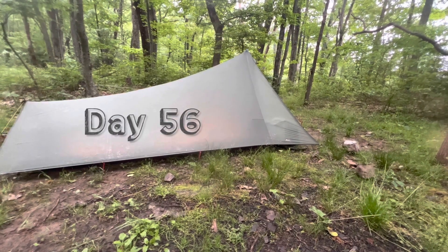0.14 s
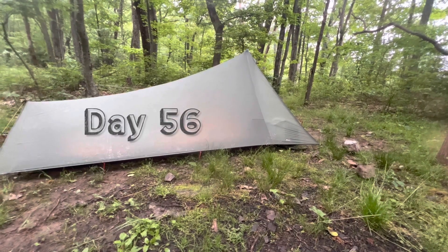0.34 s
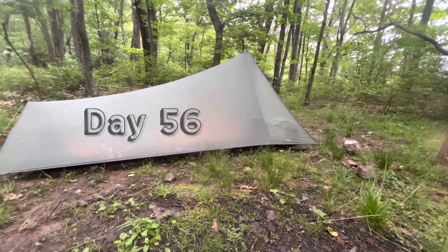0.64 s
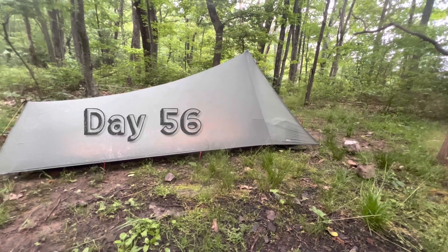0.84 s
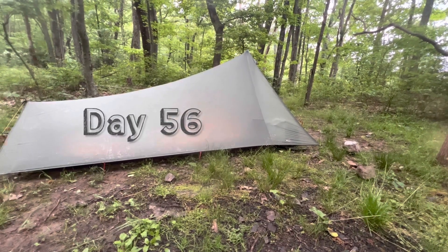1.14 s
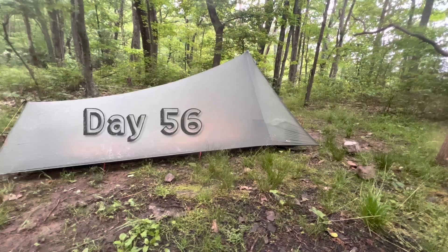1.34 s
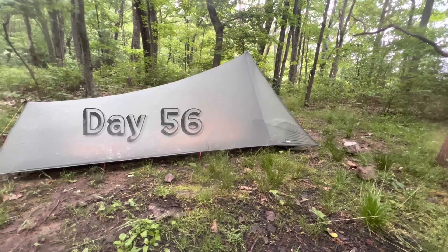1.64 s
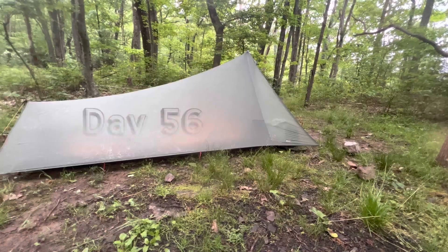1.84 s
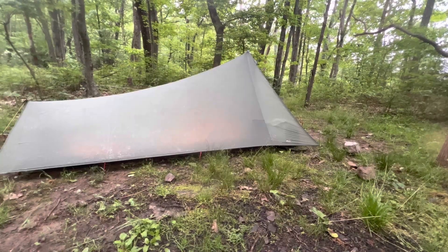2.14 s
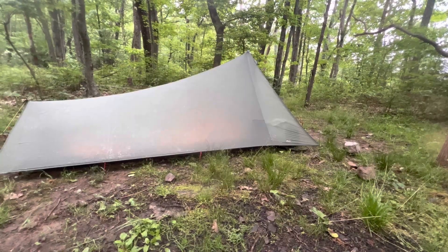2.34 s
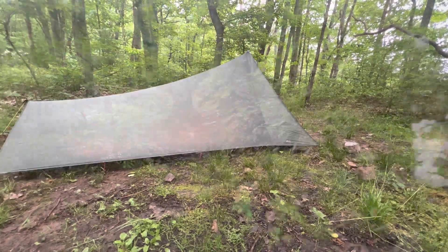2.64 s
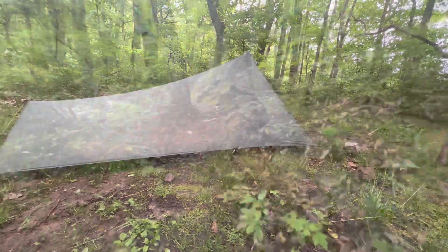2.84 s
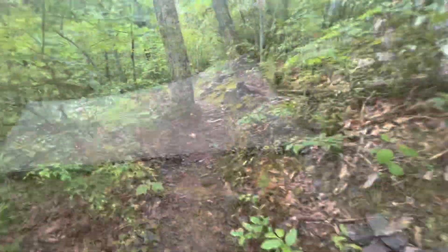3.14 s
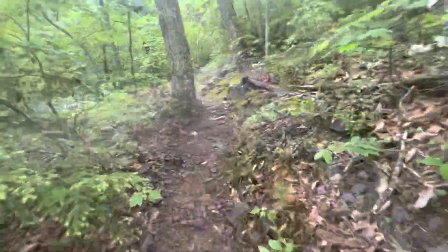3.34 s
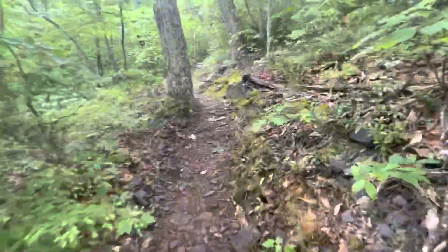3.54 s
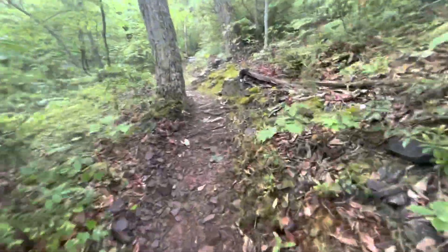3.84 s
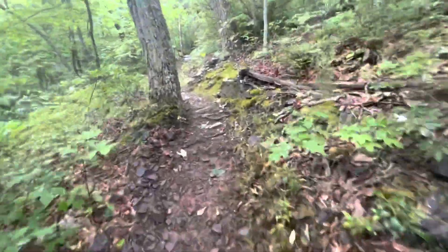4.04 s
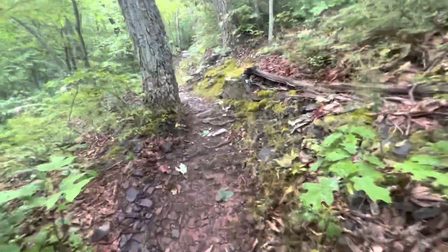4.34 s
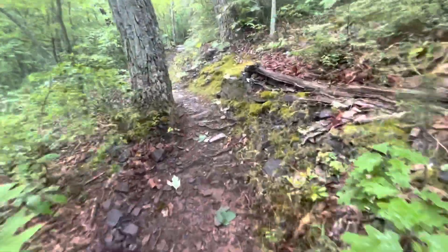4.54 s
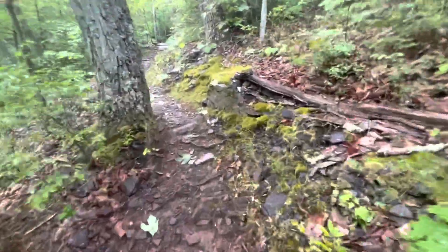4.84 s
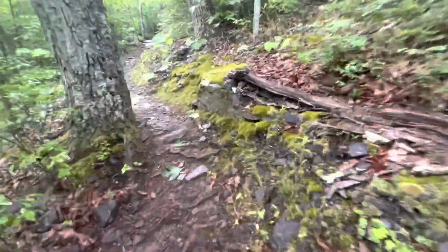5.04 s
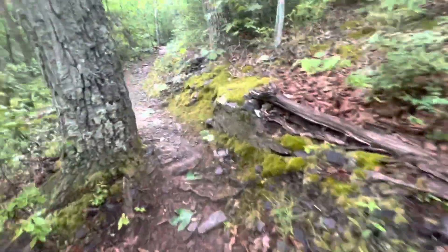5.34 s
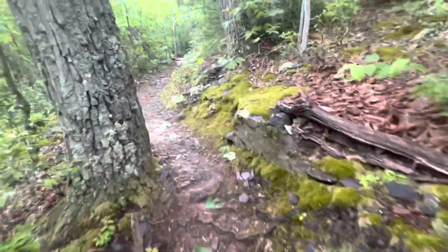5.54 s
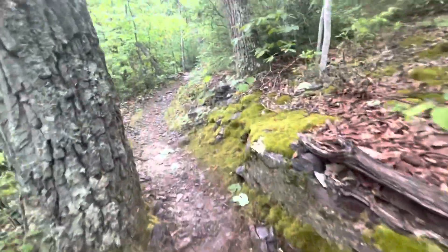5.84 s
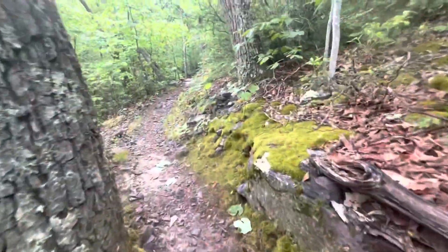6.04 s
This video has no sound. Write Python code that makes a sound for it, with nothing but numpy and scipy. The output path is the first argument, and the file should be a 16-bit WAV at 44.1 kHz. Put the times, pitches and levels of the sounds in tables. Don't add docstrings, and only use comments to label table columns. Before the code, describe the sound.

A faint hush of leaves in damp woods, with thin songbird whistles echoing off trunks and drops tapping a taut tarp and leaves. After nearly three seconds a walker sets off very close to the stereo microphone: soles crunch and scuff grit, stones knock and roll, cloth swishes, and pole tips crack sharply on rock.

```python
import sys
import numpy as np
from scipy import signal
from scipy.io import wavfile
from scipy.ndimage import uniform_filter1d, minimum_filter1d

SR = 44100
rng = np.random.default_rng(int(sys.argv[2]) if len(sys.argv) > 2 else 0)


def wav_record(signal):
    frames = np.transpose(np.atleast_2d(signal))
    bounded = np.clip(frames, -1, 1)
    quanta = np.round(bounded * 32767).astype(np.int16)
    wavfile.write(sys.argv[1], SR, quanta)


def ratio(d):
    e = np.asarray(d, float) / 20
    return 10 ** e


N = 272097

# t/s, grit level/dB, heel weight over grit/dB, scuff over grit/dB
SOLE_PRESSES = [(2.772, -39.5, -6.5, -5), (2.87, -57, 8.5, -14), (3.04, -56.5, -15, -11),
                (3.15, -70, -12, 17), (3.41, -46, 1, 1.5), (3.56, -49.5, -6, -3.5), (3.65, -53, -21, -20),
                (3.879, -47, -6, -2.5), (3.96, -47, -3, -2.5), (4.14, -53.5, -4.5, 4),
                (4.37, -68.5, -19, 17.5), (4.462, -51, 3, -3.5), (4.53, -49, -7, -0.5), (4.68, -53, 0, 0),
                (4.75, -51, 4.5, 1), (4.84, -72.5, -8, 15), (4.926, -51, 6.5, -6), (5.011, -45, -3, -0.5),
                (5.12, -50, -8.5, -3), (5.23, -50, -9, 5), (5.572, -48, -7, -0.5), (5.662, -45.5, -21, -5),
                (5.779, -56, 4.5, -17), (5.868, -46, -12, -20), (6.0, -55.5, -24, -5.5),
                (6.12, -49, -1, -6)]
TREBLE_HZ = 12430


def rms_one(x):
    return x / np.sqrt(np.mean(x ** 2) + 1e-20)


def at_hz(points, hz):
    f, value = np.array(points).T
    return np.interp(np.log(hz), np.log(f), value)


def band(x, low_hz, high_hz):
    return signal.sosfilt(signal.butter(2, [low_hz, min(high_hz, .46 * SR)], "band", fs=SR, output="sos"), x)


def drift(rate_hz):
    r = np.exp(-80 * np.pi * rate_hz / SR)
    slow = signal.lfilter([1], [1, -2 * r, r * r], rng.standard_normal(N // 40 + 2002))[2000:]
    return np.interp(np.arange(N) / 40, np.arange(len(slow)), rms_one(slow))


def stereo(pair, hz):
    # f/Hz, left-right likeness (-1 to 1)
    port_likeness = [(60, 0.625), (180, 0.82), (550, 0.56), (1650, 0.086), (4970, -0.13), (15000, -0.06)]
    alike = np.clip(at_hz(port_likeness, hz), -.95, .95)
    return np.sqrt(1 + alike) * pair[0] + np.sqrt(1 - alike) * pair[1] * [[1], [-1]]


def coloured(spectrum, patchy_db):
    out, white = 0, rng.standard_normal((2, 2, N))
    lowest_hz, highest_hz = spectrum[0][0], spectrum[-1][0]
    edges = lowest_hz * 2 ** np.arange(0, np.log2(highest_hz / lowest_hz) + .1, 1 / 3)
    for k, (low, high) in enumerate(zip(edges, edges[1:])):
        hz = np.sqrt(low * high)
        gain = ratio(at_hz(spectrum, hz) + patchy_db * drift(14.9))
        out = out + gain * stereo(band(white[k % 2], low, high), hz)
    return out


def trees(x, t60):
    t = np.arange(int(.6 * SR)) / SR
    tail = rng.standard_normal((2, len(t))) * ratio(-60 * t / t60) * (t > .012)
    return signal.fftconvolve(x[None], tail / np.sqrt(np.sum(tail ** 2) / 2), axes=1)[:, :N]


def taps(events, spread, alike, length_ms, crack_db):
    out, t = np.zeros((2, N + 2048)), np.arange(2000) / SR
    puff = np.sqrt(t) * np.exp(-t / (length_ms / 1000))
    port_lag_s = 0.00045
    for s, peak_db, hz, pan_db in events:
        shared, *own = rng.standard_normal((3, len(t)))
        body = 3.4 * np.sqrt(hz / SR) * np.sin(2 * np.pi * hz * t)
        tap = (shared + body + np.clip(1 - alike, 0, 1) * 2 * np.array(own)) * puff
        ring = band(band(tap, hz / spread, hz * spread), hz / 3, min(hz * 3, TREBLE_HZ))
        tap = rms_one(ring) + ratio(crack_db) * rms_one(band(tap, TREBLE_HZ, 15600))
        side_db = np.array([[pan_db], [-pan_db]]) / 2
        tap = tap / np.abs(tap).max(axis=1, keepdims=True) * ratio(peak_db + 1.0 + side_db)
        lag = round(port_lag_s * SR * np.clip(pan_db / 3, -1, 1))
        for side, late in enumerate((max(-lag, 0), max(lag, 0))):
            i = round(s * SR) + late
            out[side, i:i + len(t)] += tap[side]
    return out[:, :N]


def thuds(events):
    return taps(events, spread=2.53, alike=0.97, length_ms=2.56, crack_db=-60)


def knocks(events):
    return taps(events, spread=1.82, alike=0.268, length_ms=1.8, crack_db=-33)


def ticks(events):
    return taps(events, spread=2.02, alike=0.65, length_ms=0.92, crack_db=-12.5)


def footfalls():
    # t/s, peak level/dB, ring f/Hz, left-right/dB
    landings = [(2.722, -51.5, 554, 0), (2.833, -43.5, 540, -0.5), (3.133, -40.5, 322, 0.5),
                (3.138, -42.5, 296, 1), (3.336, -42.5, 851, -18.5), (3.378, -38.5, 475, 0),
                (3.389, -35, 548, 0), (3.403, -45, 880, 11), (3.617, -44, 426, 1), (3.868, -39.5, 570, 0.5),
                (3.889, -38, 562, 2), (3.897, -30.5, 500, 1.5), (4.45, -41, 358, -1.5),
                (4.734, -27, 484, 1), (4.744, -35.5, 585, 16), (4.989, -56, 899, -3.5),
                (5.005, -38.5, 405, 0.5), (5.047, -40, 656, 0), (5.183, -32.5, 720, 7),
                (5.556, -35.5, 523, 1), (5.566, -35.5, 298, 0), (3.084, -49, 450, 4), (3.791, -45, 643, 0),
                (4.463, -41, 384, 4), (5.769, -38, 787, 0.5), (6.105, -35.5, 320, 0.5)]
    # t/s, peak level/dB, ring f/Hz
    stones = [(2.7242, -39, 1595), (2.8593, -36, 1864), (3.083, -41, 2542), (3.1355, -38.5, 880),
              (3.331, -39.5, 2480), (3.458, -47.5, 1005), (3.7887, -36, 2280), (3.85, -37, 2290),
              (3.8885, -43, 1380), (4.117, -35, 1500), (4.14, -34, 2930), (4.255, -41, 2341),
              (4.445, -38, 1362), (4.519, -36.5, 1010), (4.545, -36, 2800), (4.9884, -35, 1250),
              (5.053, -33.5, 2222), (5.182, -34.5, 2126), (5.3977, -39, 2410), (5.5652, -35.5, 1330),
              (5.594, -34, 1468), (5.8536, -36, 1232), (6.1032, -31, 1400)]
    # t/s, peak level/dB, ring f/Hz, left-right/dB
    snaps = [(2.7915, -51.5, 1290, 1.5), (2.813, -47.5, 1350, -1.5), (2.8358, -32.5, 1290, 0),
             (2.855, -45, 1800, 1), (3.134, -36.5, 2400, -0.5), (3.2775, -44, 910, -0.5),
             (3.278, -40.5, 2800, 0), (4.376, -43, 1800, 0), (5.177, -43.5, 2200, -0.5),
             (5.261, -37, 1000, 5), (3.3785, -29.5, 827, 1), (3.4055, -25.5, 1050, 0),
             (3.411, -24.5, 1310, 1), (3.4235, -31.5, 2580, 2.5), (3.4605, -41, 800, 0),
             (3.5495, -35.5, 3300, -2), (3.5685, -36, 2680, 2), (3.633, -45.5, 1300, -0.5),
             (3.493, -39.5, 990, -0.5), (3.8415, -34, 1390, 2.5), (3.9185, -36, 1100, -1),
             (3.9355, -30.5, 1200, 4), (3.9387, -23, 1346, 1.5), (3.9437, -27, 1050, -0.5),
             (3.951, -43, 1100, 7), (3.958, -28, 1090, -1.5), (3.961, -31, 1050, -1),
             (3.9675, -43, 3100, 1.5), (3.9757, -20, 1198, 1), (4.061, -42, 1070, 2), (4.338, -40, 2630, 2),
             (4.3585, -32.5, 1300, 1), (4.4168, -30.5, 1510, -1), (4.4168, -35, 2940, -12),
             (4.498, -50.5, 1290, 3), (4.525, -30.5, 1686, 1), (4.529, -37, 1100, -0.5),
             (4.7332, -7.5, 1626, 2.5), (4.7385, -29, 900, -2), (4.968, -50, 1000, 0), (5.052, -34, 892, 1),
             (5.101, -37, 900, 0), (5.153, -37, 2300, 5), (5.773, -31, 1360, 0), (5.878, -37, 1320, -0.5),
             (5.896, -32.5, 1326, 0), (5.997, -42, 780, -2)]
    # t/s, peak level/dB, ring f/Hz, left-right/dB
    clicks = [(2.765, -39.5, 5950, 7.5), (2.861, -41.5, 6320, 13), (4.995, -40, 10000, 3),
              (3.137, -30.5, 8170, 6.5), (3.3314, -42.5, 6150, 4.5), (3.341, -31, 9600, -4),
              (3.394, -31, 5836, 12), (3.423, -33, 4272, 8), (3.804, -39.5, 4700, -0.5),
              (3.841, -30, 6010, 6), (3.868, -30.5, 5944, 8), (3.894, -36, 5700, 16),
              (3.9371, -38, 4920, 16), (4.416, -43, 6300, 8), (4.441, -23, 9660, -7),
              (4.4667, -41, 5100, 16), (4.518, -37.5, 8757, 11), (4.5795, -44, 5770, 12),
              (4.735, -19, 8800, 2), (4.8826, -15, 5470, 4), (4.732, -37, 10430, 0), (4.883, -29, 10460, 1),
              (5.158, -27, 9400, 2.5), (5.3871, -35.5, 6040, 7), (5.404, -43, 6520, 9),
              (5.553, -25.5, 10200, -4.5), (5.7717, -34, 9100, -2), (5.857, -26, 5130, 13.5)]
    stone_pan_db = -0.26
    sound = thuds(landings) + ticks(clicks)
    sound += knocks([(*stone, stone_pan_db) for stone in stones] + rolling())
    return sound + taps(snaps, spread=1.84, alike=0.652, length_ms=0.61, crack_db=-46)


def rolling():
    rolls = [
        (3.396, -28.5, 2497, 0),
        (3.406, -26.5, 1130, 1.5),
        (3.547, -33, 2531, 2),
        (3.566, -35, 2284, 9),
    ]
    gap_s, build_db, loss_db, pitch_spread = 0.0053, 4.0, 2.5, 0.068
    touches = []
    for (s, db, hz, pan_db), luck in zip(rolls, rng.standard_normal((len(rolls), 6, 2))):
        for k, (late, pitch) in zip(range(-1, 5), luck):
            below_db = loss_db * k if k > 0 else -build_db * k
            touch_s = s + gap_s * k * (1 + 0.19 * late)
            touches.append((touch_s, db - below_db, hz * (1 + pitch_spread * pitch), pan_db))
    return touches


def pole_tips():
    # t/s, peak level/dB, ring f/Hz, left-right/dB
    strikes = [(4.732, -19.5, 2566, 2), (4.7425, -16, 2510, 5), (4.883, -16, 2722, 2.5),
               (4.8902, -19, 2530, 1), (4.896, -16, 2570, 2), (4.901, -24, 2515, 1),
               (4.906, -13.5, 2650, 3), (4.9158, -14.5, 2340, 0.5), (4.917, -17, 1166, 9.5),
               (4.9185, -17, 595, 2.5), (5.589, -28, 2840, 6), (4.7335, -23.5, 4290, 5),
               (4.7345, -21, 6340, 2.5), (4.745, -23, 4630, 6), (4.9078, -22, 4960, 13.5),
               (4.9085, -27, 8100, 1.5), (4.9174, -27, 5190, -3)]
    return taps(strikes, spread=2.17, alike=0.6, length_ms=1.6, crack_db=-39)


def skids():
    # t/s, level/dB, half length/s, first f/Hz, last f/Hz
    slides = [(2.87, -48.5, .018, 2007, 2514), (3.036, -50.5, 0.015, 2083, 2800),
              (3.548, -36.5, 0.0075, 2600, 2567), (3.55, -40, .008, 3940, 3900),
              (3.59, -45, 0.0103, 2486, 1986), (4.31, -54, 0.0081, 2700, 2750),
              (4.877, -42, 0.0038, 2600, 2780), (5.238, -50.5, 0.021, 2570, 3130),
              (5.296, -52.5, 0.0132, 2650, 1829), (5.529, -50, 0.013, 2474, 2783),
              (5.825, -54, 0.0138, 2620, 2616)]
    out = np.zeros((2, N))
    narrow = signal.butter(2, 396, fs=SR, output="sos")
    slow = rms_one(signal.sosfilt(narrow, rng.standard_normal((2, 2, N))))
    for s, db, half_s, first_hz, last_hz in slides:
        i = np.arange(int((s - 3 * half_s) * SR), int((s + 3 * half_s) * SR))
        away = (i / SR - s) / half_s
        phase = 2 * np.pi * np.cumsum(np.interp(away, [-2, 2], [first_hz, last_hz])) / SR
        singing = slow[0][:, i] * np.cos(phase) + slow[1][:, i] * np.sin(phase)
        out[:, i] += ratio(db) * np.exp(-.5 * away ** 2) * singing
    return out


def pressing(over_db, rise, fall, rest_db):
    presses = np.array(SOLE_PRESSES)
    since = np.arange(0, N + 64, 64) / SR - presses[:, :1]
    db = (presses[:, 1] + over_db)[:, None] - np.where(since < 0, -rise * since, fall * since)
    gain = np.sqrt(np.sum(ratio(db) ** 2, axis=0) + ratio(rest_db) ** 2)
    return np.interp(np.arange(N) / 64, np.arange(len(gain)), gain)


def gritty(low_hz, high_hz, per_s, spread_db, clump_db):
    sizes = ratio(spread_db * np.minimum(rng.exponential(1, N), 4))
    born, dealt = rng.random(N) < per_s / SR, rng.integers(0, 4, N)
    grains = born * sizes * ratio(clump_db * drift(32.0)) * rng.standard_normal((2, N))
    edges = np.geomspace(low_hz, high_hz, 5)
    rings = sum(band(grains * (dealt == k) + 1e-18, edges[k], edges[k + 1]) for k in range(4))
    return rms_one(stereo(rings, np.sqrt(low_hz * high_hz)))


def cloth():
    # f/Hz, level/dB per Hz
    swish_spectrum = [(1180, -5.5), (2000, -7), (2850, -4), (3370, -16.5), (5420, -7.5), (6360, -10.5),
                      (9210, -5), (10600, -14), (11500, -30), (12700, -27.5), (14800, -20), (16500, -53)]
    # t/s, level/dB, half length/s
    strides = [(2.773, -41, 0.0163), (2.876, -36.5, 0.0145), (3.042, -43.5, 0.034), (3.427, -49.5, 0.029),
               (3.586, -46.5, 0.045), (3.905, -53, 0.064), (4.13, -44.5, 0.041), (4.512, -49.5, 0.0473),
               (4.701, -41, 0.0473), (5.01, -48.5, 0.042), (5.237, -40.5, 0.0387), (5.401, -52, 0.02),
               (5.577, -57, 0.099), (5.821, -44, 0.0597), (6.16, -50.5, 0.067)]
    t = np.arange(N) / SR
    rubbing = ratio(-54) + sum(ratio(db) * np.exp(-.5 * ((t - s) / half_s) ** 2) for s, db, half_s in strides)
    rubbing = rubbing * ratio(1.5 * drift(70))
    swish = rubbing * rms_one(coloured(swish_spectrum, patchy_db=-3.0))
    fine = band(band(rng.standard_normal((2, N)), 12100, 15600), 12100, 15600)
    return swish + ratio(-70.5) * rms_one(stereo(fine, 500))


def walker():
    _, _, heel_db, scuff_db = np.transpose(SOLE_PRESSES)
    heel = gritty(71.0, 320, per_s=730, spread_db=0.0, clump_db=0.5)
    grit = gritty(380, 1900, per_s=2500, spread_db=1.8, clump_db=1.2)
    scuff = gritty(750, 5000, per_s=5000, spread_db=2.0, clump_db=1.0)
    sound = pressing(heel_db, rise=320, fall=289, rest_db=-67) * heel
    sound += pressing(0, rise=231, fall=95, rest_db=-59) * grit
    sound += pressing(scuff_db, rise=350, fall=130, rest_db=-60) * scuff
    sound += cloth()
    return sound * np.clip((np.arange(N) / SR - 2.6) / 0.78, 0, 1)


def drips():
    # t/s, peak level/dB, ring f/Hz, left-right/dB
    drumming = [(0.08, -53.5, 382, 1), (0.204, -55, 192, 5), (0.306, -51.5, 816, 1.5),
                (0.667, -43.5, 430.4, -3.5), (0.674, -49, 252, -2), (0.69, -51, 333, -3),
                (0.988, -58.5, 784, 2), (1.039, -34, 615, 6.5), (1.041, -50, 203, 12),
                (1.755, -57.5, 364, 15), (2.06, -54, 128, 6), (1.128, -47, 835, 2.5),
                (2.255, -43.5, 704, 10), (2.53, -46.5, 267, 1.5)]
    # t/s, peak level/dB, ring f/Hz, left-right/dB
    slaps = [(0.309, -48.5, 4670, 13.5), (0.665, -40.5, 1354, 2), (0.673, -47, 900, 1),
             (0.082, -48.5, 710, 5), (1.041, -64.5, 1680, 3), (0.67, -40.5, 2250, 1),
             (0.6705, -38.5, 3525, 4), (0.676, -38, 2680, 1.5), (0.82, -40, 2683, 9),
             (0.9906, -47, 875, -1.5), (1.0405, -42, 890, -2), (2.2579, -29.5, 2950, 0.5),
             (2.3675, -34.5, 1253, 0.5), (2.5311, -39.5, 3095, 6)]
    # t/s, peak level/dB, ring f/Hz, left-right/dB
    leaf_ticks = [(0.3655, -42, 5000, 9), (0.5097, -43, 5200, 9), (0.7346, -49, 8410, 3),
                  (0.7694, -49, 4120, 8), (0.82, -33, 5200, 7.5), (0.8626, -44.5, 4260, 10),
                  (1.148, -47.5, 6000, 9), (1.185, -42, 7990, 10), (1.3247, -27.5, 7752, 4.5),
                  (1.365, -49, 8060, 13), (1.7483, -52, 5560, 16.5), (2.2328, -50, 4930, 13.5),
                  (2.259, -28, 5340, 5.5), (2.2997, -38.5, 8090, 3), (2.368, -44, 4570, 12.5)]
    return thuds(drumming) + knocks(slaps) + ticks(leaf_ticks)


def birds():
    # start t/s, length/s, first f/Hz, last f/Hz, level/dB
    whistles = [(0.017, 0.05, 4790, 4750, -57), (0.225, 0.063, 4320, 4440, -59),
                (0.29, 0.22, 4860, 4790, -59.5), (0.384, 0.095, 3930, 3940, -59),
                (0.413, 0.071, 4200, 4230, -63), (0.453, 0.027, 3960, 3958, -50.5),
                (0.058, 0.026, 3185, 3040, -57.5), (0.141, .03, 3400, 3384, -61),
                (0.531, .05, 4200, 4230, -61), (0.694, 0.031, 4280, 4295, -55),
                (0.707, 0.025, 3659, 3620, -55), (.745, 0.1063, 4259, 4258, -60),
                (0.863, 0.17, 4230, 4230, -62), (0.567, 0.077, 3837, 4150, -62)]
    # t/s, f/Hz, level/dB
    warbles = [
        [(.5, 3900, -56), (.515, 3650, -48), (.524, 3300, -51), (.54, 2330, -55.5)],
        [(.58, 2764, -50), (.605, 2745, -52), (.612, 3200, -54.5), (.62, 3660, -49), (.644, 3620, -55)],
        [(1.368, 3600, -53), (1.382, 3850, -51), (1.39, 2950, -54), (1.4, 2540, -54), (1.425, 3220, -59),
         (1.438, 3900, -55), (1.46, 4200, -54)],
        [(1.465, 4020, -51.5), (1.49, 3780, -50.5), (1.51, 3630, -57), (1.54, 3630, -55)],
        [(1.548, 3750, -58), (1.57, 3970, -61), (1.597, 3620, -54), (1.623, 3400, -50), (1.64, 2686, -57),
         (1.657, 2650, -49), (1.672, 3600, -55), (1.7, 2760, -56)],
        [(1.55, 2700, -57), (1.572, 2560, -51), (1.59, 2700, -57), (1.605, 3200, -55), (1.62, 3350, -54)],
        [(1.67, 3400, -55), (1.72, 3400, -66), (1.755, 3050, -55.5)],
        [(2.558, 3200, -48), (2.565, 3450, -52), (2.58, 3620, -53), (2.593, 3450, -55), (2.605, 2900, -55)],
        [(2.616, 2595, -55), (2.632, 2820, -47), (2.655, 2880, -68), (2.69, 2950, -56.5), (2.73, 2980, -58),
         (2.79, 2950, -64.5)],
    ]
    fade_db, pan_db = 4.5, 2
    out, flutter, waver = np.zeros((2, N)), ratio(4.2 * drift(110)), 1 + .008 * drift(110)
    notes = [[(s, first_hz, db), (s + length_s, last_hz, db - fade_db)]
             for s, length_s, first_hz, last_hz, db in whistles]
    for note in [*notes, *warbles]:
        s, hz, db = np.transpose(note)
        i = np.arange(int(s[0] * SR), int(s[-1] * SR))
        phase = 2 * np.pi * np.cumsum(np.interp(i / SR, s, hz) * waver[i]) / SR
        level = ratio(np.interp(i / SR, s, db)) * signal.windows.tukey(len(i), .25) * flutter[i]
        out[0, i] += level * np.sin(phase) * ratio(pan_db / 2)
        out[1, i] += level * np.sin(phase - 1.2) * ratio(-pan_db / 2)
    song = out.mean(axis=0)
    haze = np.abs(song) * band(rng.standard_normal(N), 2600, 4750)
    smeared = song * (.2 + 1.1 * drift(160))
    tonal = ratio(-1.5) * trees(smeared, t60=.45)
    return out + ratio([[pan_db / 2], [-pan_db / 2]]) * tonal + ratio(12) * trees(haze, t60=0.55)


def woods():
    # f/Hz, level/dB per Hz
    leaf_spectrum = [(15, -68.5), (25, -25), (65, -21), (197, -18), (358, -20), (410, -20), (600, -19),
                     (726, -15.5), (1060, -14.5), (1880, -15), (3510, -14), (8590, -18.5), (11300, -58.5),
                     (14400, -21.5), (16500, -58)]
    level_db, pan_db = -63.5, 2.5
    hush = coloured(leaf_spectrum, patchy_db=3.0)
    hush = hush / np.std(band(hush, 500, 2200))
    hush = hush * ratio(level_db + np.array([[pan_db], [-pan_db]]) / 2)
    t = np.arange(N) / SR
    echo = rms_one(band(rng.standard_normal((2, N)), 1800, 5700)) * ratio(-56.0 - 40 * t)
    air = rms_one(stereo(band(band(rng.standard_normal((2, N)), 36.6, 89.6), 58.5, 510), 50))
    lumps = ratio(2.2 * drift(8))
    rumble_db = np.interp(t, [0, 3.2, 6.17], [-64, -67.5, -60])
    return hush + echo + air * lumps * ratio(rumble_db)


def scene():
    hits = footfalls() + pole_tips() + drips()
    echoes = ratio(-15.0) * trees(band(hits.mean(axis=0), 60, 9500), t60=0.044)
    quiet = walker() + skids() + birds() + woods() + echoes
    top_gap = signal.ellip(2, .5, 13, (10300, 12100), "bandstop", fs=SR, output="sos")
    top_end = signal.ellip(8, .5, 40, 15300, fs=SR, output="sos")
    quiet = signal.sosfilt(top_end, signal.sosfilt(top_gap, quiet))
    dull = signal.sosfilt(signal.butter(6, TREBLE_HZ, fs=SR, output="sos"), hits)
    treble = signal.sosfilt(signal.butter(6, TREBLE_HZ, "high", fs=SR, output="sos"), hits)
    return quiet + dull + ratio(-4) * treble


def thin_top(x, mid_db, side_db):
    window = np.sin(np.pi * (np.arange(2048) + .5) / 2048)
    hz, _, cells = signal.stft([x[0] + x[1], x[0] - x[1]], SR, window, nperseg=2048)
    size = uniform_filter1d(np.abs(cells), size=3, axis=1)
    loud = np.median(size[:, (hz > 8200) & (hz < 9800)], axis=1, keepdims=True)
    top = np.median(size[:, (hz > 12200) & (hz < 14800)], axis=1, keepdims=True)
    bar = np.where((hz > 10200)[:, None], top * ratio([[[mid_db]], [[side_db]]]), loud * ratio(-9))
    usual_top = uniform_filter1d(minimum_filter1d(top, size=5), size=5)
    sudden = top > ratio(6) * usual_top
    kept = (size > bar) | (hz < 3000)[:, None] | sudden
    mid, side = signal.istft(cells * kept, SR, window, nperseg=2048)[1][:, :N] / 2
    return np.array([mid + side, mid - side])


def low_pass(x):
    return signal.sosfilt(signal.butter(12, 16640, fs=SR, output="sos"), x)


def record(dry):
    # f/Hz, width/Hz, depth (0-1)
    port_dips = [(7730, 600, 0.8), (5340, 390, 0.47)]
    for hz, width_hz, depth in port_dips:
        dry = dry - np.clip(depth, 0, 1) * signal.lfilter(*signal.iirpeak(hz, hz / width_hz, fs=SR), dry)
    thinned = thin_top(dry, mid_db=2.2, side_db=6)
    mix = signal.sosfilt(signal.ellip(10, .5, 70, 16400, fs=SR, output="sos"), thinned)
    return low_pass(mix)


dry = scene()
out = record(dry)
wav_record(out)
```